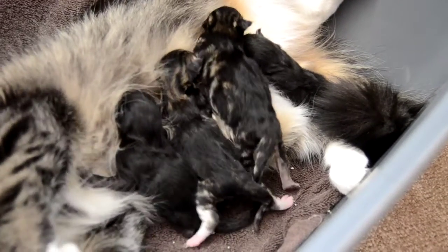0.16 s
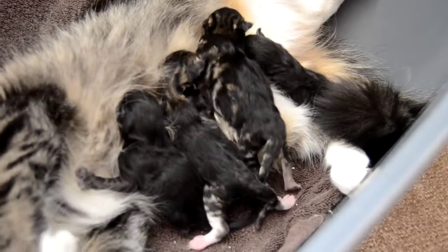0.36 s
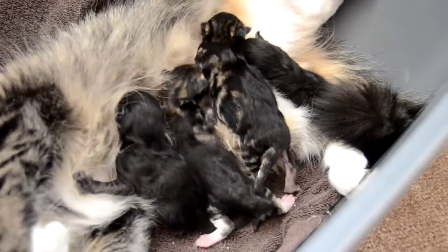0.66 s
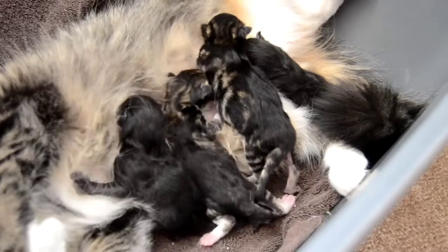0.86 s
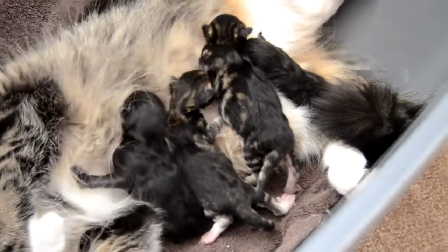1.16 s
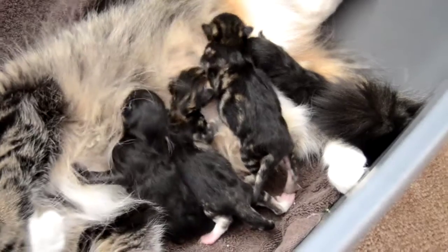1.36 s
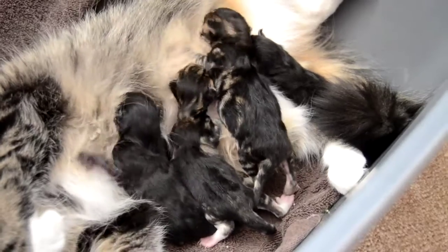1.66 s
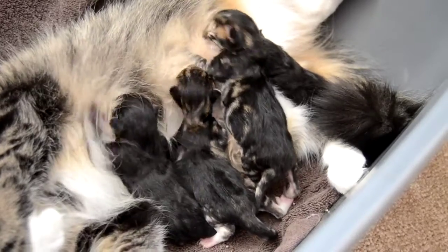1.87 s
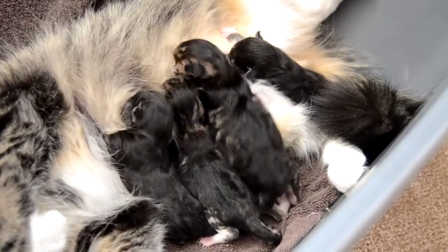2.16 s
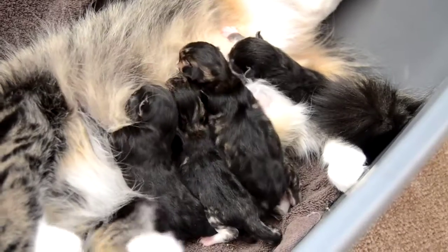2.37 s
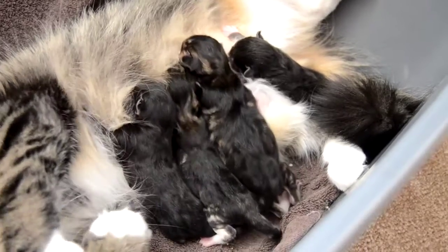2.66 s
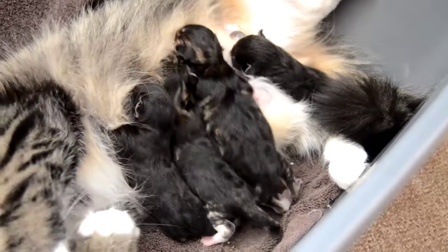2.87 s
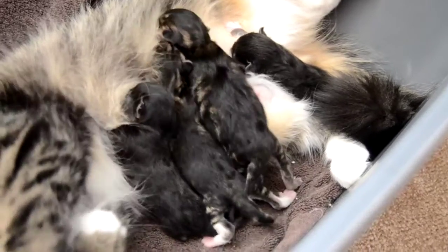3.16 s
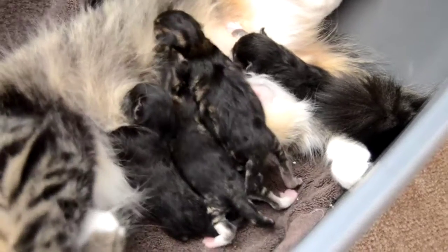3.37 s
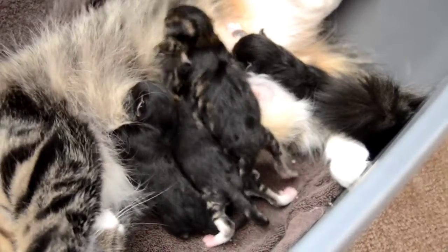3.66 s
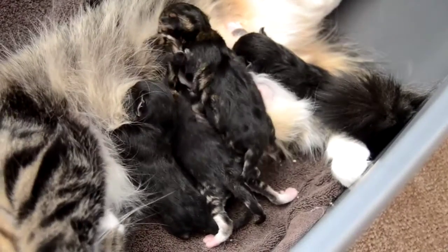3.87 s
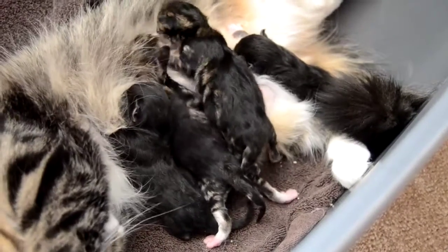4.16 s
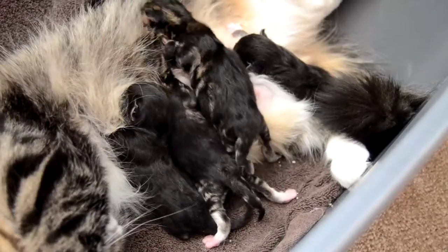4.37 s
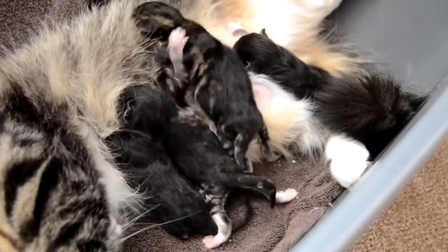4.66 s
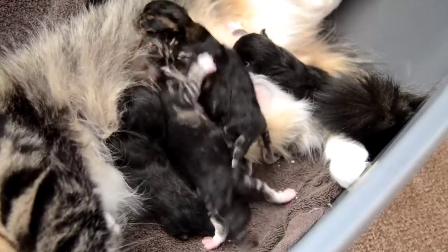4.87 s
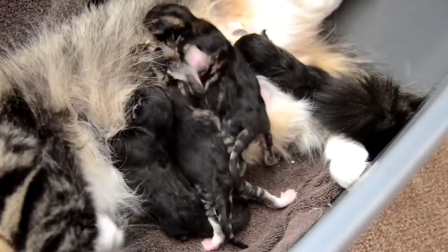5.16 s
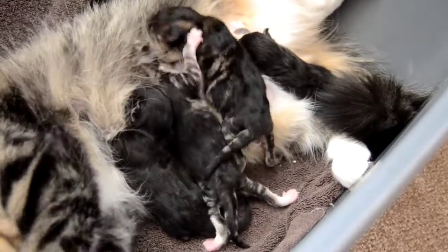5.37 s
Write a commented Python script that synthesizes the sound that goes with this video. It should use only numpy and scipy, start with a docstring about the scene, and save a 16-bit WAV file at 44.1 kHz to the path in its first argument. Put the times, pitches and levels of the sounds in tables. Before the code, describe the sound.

Soft low purring swells and fades in a quiet room while close, dry mechanical clacks and short whirrs repeatedly break in.

```python
"""A quiet room sounds throughout, with a mother cat's soft purr swelling in surges, as a pulse train through chest modes.
Near 0.6-1.5 s a camera's focus drive hunts in short moves: jolt, whirr and stop are noise through body modes,
carried by the plastic body to the built-in microphone, far louder than the purr. Nostril hiss and kittens'
shuffling, both filtered noise, come near 2.1 s; the drive's second bout follows near 2.7-3.8 s.
From 4.2 s come fainter nostril hiss and more shuffling, and near 4.9-5.5 s the drive's third bout."""
import sys
import numpy as np
from scipy import signal
from scipy.fft import rfft, irfft, next_fast_len
from scipy.io import wavfile

SR = 44100
rng = np.random.default_rng(int(sys.argv[2]) if len(sys.argv) > 2 else 0)


def inscribe(sig):
    """Save sig as 16-bit PCM at rate SR to the path in sys.argv[1].

    A 1-D sig is mono; a 2-D sig holds one channel per row.
    Samples are clipped to [-1, 1] before scaling.
    """
    pcm = np.round(np.clip(np.atleast_2d(sig).T, -1, 1) * 32767)
    wavfile.write(sys.argv[1], SR, pcm.astype(np.int16))


N = 243873
TIME = np.arange(N) / SR

# Spectrum of the room and preamp noise [f/Hz, relative level/dB per Hz]
ROOM_SPECTRUM = [(20, -36), (40, -25), (70, -5), (130, -12), (210, -6), (400, -13), (1200, -15.5),
                 (4000, -26), (6000, -30.5), (8600, -29.5), (12000, -39), (16000, -48)]
ROOM_DB, ROOM_WAVER_DB = -64.5, .3

# Kittens shuffling in the fur [t/s, level/dB, length/s, centre f/Hz]
RUSTLES = [(2.053, -66.5, 0.048, 2360), (2.123, -53, 0.019, 2500), (2.151, -58.5, 0.023, 2670),
           (2.183, -60, 0.0059, 2520), (4.249, -67, 0.026, 3900), (4.7, -59.5, 0.0072, 2220),
           (4.785, -62.5, 0.016, 6460), (5.386, -53, 0.013, 2550)]

# Larynx clock: quicker breathing in, slower breathing out [t/s, purr cycles elapsed]
LARYNX_CLOCK = [(0, .72), (.542, 16), (.758, 22), (1.547, 45), (2.26, 66), (2.526, 74), (2.813, 82),
                (3.198, 93), (4.095, 119), (4.343, 126), (4.538, 132), (4.772, 139), (5.206, 151),
                (5.53, 160.6)]
# Chest resonances [f/Hz, width/Hz, level/dB]
CHEST_MODES = [(130, 130, 0), (235, 170, 2.5)]
# Surges of the purr [start t/s, swell/s, end t/s, level/dB, second pulse share]
PURR_SURGES = [(.05, 0.26, 0.64, -59, 0.43), (1.4, 0.083, 1.83, -62, 0.1), (1.98, 0.14, 2.38, -70, -0.87),
               (2.52, .1, 2.92, -59.5, 0.1), (3.62, 0.12, 4.05, -63.5, 0.76), (4.2, .1, 4.65, -68, -0.4),
               (4.76, 0.1, 5.18, -57.5, 0.2)]
# Between surges the purr is faint and its second pulse turns over
FADE_S, REST_DB, REST_SHARE = 0.1, -70, -0.42
REOPEN_S, JITTER_S, PULSE_SPREAD_DB = .0098, .0003, 1.1
# Pressure builds, then lets go; the purr's lowest notes are faint
BUILD_S, SNAP_HZ, BASS_LOSS_HZ = .005, 600, 58
# Turbulence under the pulses, and rattle on each pulse, relative to the chest sound
THROAT_AIR_DB, THROAT_RATTLE_DB = -15, -20
# Air through the nostrils on the in-breath [start t/s, end t/s, level/dB]
NOSTRIL_BREATHS = [(2.15, 2.46, -79.5), (4.25, 4.62, -85.5)]
SNIFF_EDGE_S = .08

# Thin parts that ring on after some stops [t/s, f/Hz, level/dB, t60/s]
PART_RINGS = [(.66, 6300, -52, 0.066), (.832, 2350, -60, 0.28), (.99, 5400, -61, 0.1),
              (1.273, 3070, -41, .065), (2.92, 2330, -61, .25), (2.92, 5350, -64, .15),
              (3.112, 3480, -62, 0.28), (3.112, 6250, -58, 0.073), (3.276, 5300, -60, .12),
              (3.566, 3070, -50, .05), (5.17, 2370, -57, 0.27), (5.325, 3500, -58, .2),
              (5.485, 4860, -60, .15)]
# Rising squeaks as the drive takes up load [t/s, length/s, from f/Hz, to f/Hz, level/dB]
LOAD_SQUEAKS = [(1.407, 0.03, 1480, 2730, -37.5), (3.711, 0.028, 1506, 3190, -36)]
# Bright ticks of a small part in the drive [t/s, nominal peak level/dB]
PART_TICKS = [(0.5856, -25), (0.7433, -23), (1.1323, -18), (1.1513, -31), (1.1918, -34), (2.6678, -34),
              (2.6783, -21.5), (2.827, -29), (3.5658, -25.5), (3.6346, -29), (4.9182, -34), (4.9283, -22.5),
              (5.0809, -26)]
# Modes of that small part [f/Hz, width/Hz, relative level/dB]
SMALL_PART_MODES = [(9520, 770, 2), (8000, 800, -6.5)]
TICK_T60_S, TICK_MAKEUP_DB = 0.0038, 9.0

# Moves of the drive, levels at 1.5-5.5 kHz unless named otherwise [start t/s, jolt peak level/dB, jolt t60/s,
# its relative treble level/dB, whirr start level/dB, whirr end level/dB, mid-move swell/dB, extra bass/dB,
# extra treble/dB, bass thump level/dB, stop t/s, catch peak level/dB, knock delay/s, knock peak level/dB,
# its relative bass level/dB]
DRIVE_MOVES = [(0.57, -24.5, 0.064, -18, -38, -49.5, 0.4, 1.5, 0, -53, 0.6579, -24, 0.0023, -51, -24),
               (0.7355, -20.5, .034, -24, -32.5, -52.5, -0.2, -1, -1.5, -41.5, 0.8248, -24, 0.004, -18, -24),
               (0.905, -22, 0.038, -13, -40, -50.5, 1, 1, -0.3, -53.5, 0.9849, -25, 0.0035, -20.5, -24),
               (1.071, -28, 0.015, 3, -42.5, -40.5, 2, 3.5, 1.2, -55, 1.268, -45, 0.0035, -18.5, -12.5),
               (1.3253, -21.5, 0.013, -18, -35.5, -47.5, -1, 0.7, .6, -46.5, 1.498, -23, 0.0039, -20, -28),
               (2.6581, -16.5, 0.027, -16, -38.5, -51.5, 2, 1.5, 0, -51, 2.7465, -26, .002, -29.5, -16),
               (2.8204, -15.5, 0.024, -21, -37.5, -48, -2.5, -4, 0.3, -49, 2.9144, -24, 0.0031, -18.5, -18.5),
               (3.0292, -19, 0.043, -17, -42.5, -50.5, 0, 2.5, 1.5, -66, 3.1053, -23.5, 0.005, -20, -25),
               (3.2037, -29, 0.047, -2, -45.5, -41.5, 2.5, -.6, 0.2, -53.5, 3.272, -36, 0.0019, -14, -17.5),
               (3.3362, -25, .015, 2.5, -46, -41.5, 1.5, 1, 1.5, -61, 3.562, -40, 0.0024, -15.5, -17.5),
               (3.628, -24, 0.029, -13, -40, -52.5, 4, -1, 2, -63, 3.7872, -22, 0.0061, -25.5, -24),
               (4.9083, -17.5, 0.019, -14, -35.5, -48, -1.5, .6, 0.7, -52, 4.995, -26.5, 0.0015, -21.5, -26),
               (5.0736, -17.5, 0.029, -19, -40.5, -49.5, 0.7, .6, -0.5, -40.5, 5.1668, -24, 0.003, -22, -26),
               (5.241, -28, 0.045, -10, -38.5, -53, 3, -3, -0.3, -60, 5.3202, -21, 0.0038, -23.5, -21),
               (5.4084, -27.5, 0.028, -1, -42.5, -48, -1.5, 2, .6, -50.5, 5.4813, -26, 0.0018, -19, -42)]
GLIDE_POWER, TAKE_UP_S, THUMP_S, THUMP_WIDTH_S = 1.54, 0.02, 0.026, 0.0082
# Whirr under 700 Hz, at 700-1500 Hz and over 5.5 kHz
# [level/dB while the middle is at WHIRR_DB, share of its swing, level missing at the start/dB]
WHIRR_SIDE_BANDS = [(-58.5, 0.84, -11.5), (-51.5, 1, -4), (-53.5, 0.79, -4.5)]
WHIRR_DB = -45
# Further gear knocks, during moves or just after a stop
# [t/s, peak level/dB, relative level under 700 Hz/dB, t60/s]
GEAR_KNOCKS = [(0.5798, -24, -37, 0.025), (0.5846, -30, -36, 0.044), (0.746, -26, -24, 0.026),
               (0.754, -28, -14, 0.052), (0.9285, -25.5, -31, 0.026), (1.0312, -45, -16, .038),
               (1.0984, -14.5, -35, 0.029), (1.1082, -21.5, -10.5, 0.018), (1.1238, -16, -19, 0.022),
               (1.129, -14.5, -25, .017), (1.152, -26, -19, 0.051), (1.1747, -30, -29, 0.019),
               (1.193, -33.5, -3, 0.016), (1.2212, -26, -6, 0.02), (1.333, -30, -19, .033),
               (1.3503, -33, -1, 0.051), (2.6712, -20, -13, 0.032), (2.6786, -19, -25, 0.024),
               (2.829, -17, -32, 0.031), (2.8443, -34, 5, 0.025), (3.045, -31.5, -32, 0.097),
               (3.229, -28, -18, 0.044), (3.2877, -29, 1, 0.017), (3.3438, -26.5, -27, 0.025),
               (3.3826, -21, -31, 0.041), (3.3902, -30.5, -12.5, 0.077), (3.4271, -20.5, -10, 0.016),
               (3.6336, -30, -19, 0.033), (3.6452, -26, -8.5, .035), (4.9189, -16, -14.5, 0.027),
               (4.928, -28, -20, 0.05), (5.081, -20, -34, 0.044), (5.0982, -38, -20, .015),
               (5.4323, -25.5, -30, .043)]
# A bassy knock is fuller at 700-1500 Hz too
KNOCK_LOW_DB, LOW_PER_BASS, KNOCK_HIGH_DB = -7.5, 0.2, -16
KNOCK_CREST_DB, KNOCK_RISE_S = 6.5, 0.00029
# Relative levels/dB of a jolt: under 700 Hz, at 700-1500 Hz
JOLT = (-26, -20)
# Of a catch: the same two, over 5.5 kHz, then t60/s
CATCH = (-24.5, -19.5, -3.5, 0.0588)
# Of a stop knock: at 700-1500 Hz, over 5.5 kHz, then t60/s
STOP = (-17.5, -14, 0.037)
# Relative knock length in the bands 1.5-5.5 kHz, under 700 Hz, 700-1500 Hz, over 5.5 kHz
KNOCK_LENGTHS = (0.61, 1.3, 1.36, 0.5)
# Camera body resonances in those four bands [f/Hz, width/Hz, running level/dB, knocked level/dB]
MID_MODES = [(1555, 163, -10, -7.5), (2099, 317, 2.5, -1), (2267, 168, 3.5, 4.5), (2563, 155, -1, -0.5),
             (2936, 156, 0, 1), (3350, 207, -2, 1.5), (3620, 110, -3.5, -1), (3975, 204, -8.5, -5),
             (4716, 360, -3, -6.5), (5237, 370, -9, -10)]
BASS_MODES = [(245, 115, 0.18, 0), (650, 107, -0.18, 0.6)]
LOW_MODES = [(747, 100, -4.5, -2), (1029, 89, 1.5, 6), (1354, 340, -6, -3.5)]
HIGH_MODES = [(6240, 400, -0.5, 10), (6820, 81, -0.5, 13), (7440, 550, -6.5, 8.5), (8380, 490, -10, -5),
              (8500, 220, -8.5, -38), (10230, 2000, -11.5, -0.5), (12300, 1500, -22, -24),
              (13400, 2400, -27, -32)]
# Modes above this get a second, grainless noise
SECOND_NOISE_HZ = 11000
MODE_WANDER_DB, TOOTH_GRAIN_DB, TOOTH_CLUMP_DB = 2.0, 2.5, 2.0
TAIL_DB, TAIL_T60_S = -27, .07

# Microphone port [f/Hz, width/Hz, depth share]
PORT_CANCELLATIONS = [(5720, 330, .92), (6900, 160, .75)]
CUTOFF_HZ = 15800


def from_db(db):
    """Level definition: amplitude gain is ten to the power of dB over 20."""
    return 10 ** (np.asarray(db) / 20)


def rms_one(x):
    """Power normalization: scale to rms 1."""
    return x / np.sqrt(np.mean(x ** 2) + 1e-20)


def drift(rate):
    """Slow random modulation: normal random points, rate per second, joined by straight lines."""
    steps = TIME * rate
    last = int(steps[-1]) + 2
    return np.interp(steps, np.arange(last), rng.standard_normal(last))


def resonate(x, hz, width_hz):
    """Damped resonance: a two-pole mode with gain 1 on top."""
    r = np.exp(-np.pi * width_hz / SR)
    zeros = [(1 - r * r) / 2, 0, (r * r - 1) / 2]
    poles = [1, -2 * r * np.cos(2 * np.pi * hz / SR), r * r]
    return signal.lfilter(zeros, poles, x + 1e-18)


def ramp(start, length):
    """Linear growth: 0 before start, 1 after start + length."""
    return np.clip((TIME - start) / length, 0, 1)


def room():
    """Stationary noise: random pressure with a coloured spectrum and a level that wavers a little."""
    size = next_fast_len(N)
    hz = np.maximum(np.arange(size // 2 + 1) * SR / size, 1)
    table_hz, table_db = np.transpose(ROOM_SPECTRUM)
    shape = from_db(np.interp(np.log(hz), np.log(table_hz), table_db))
    noise = irfft(rfft(rng.standard_normal(size)) * shape, size)[:N]
    return from_db(ROOM_DB + ROOM_WAVER_DB * drift(4.13)) * rms_one(noise)


def rustle():
    """Friction noise: fur and claws brush cloth in brief grainy bursts, each around one broad resonance."""
    out = np.zeros(N)
    grains = rng.standard_normal(N) * from_db(2.5 * drift(300))
    for s, level_db, length, hz in RUSTLES:
        age = np.maximum(TIME - s, 0) / length
        brush = grains
        for _ in range(4):
            brush = resonate(brush, hz, hz)
        out += from_db(level_db) * rms_one(brush) * np.sqrt(age) * np.exp(-age ** 2)
    return out


def breath():
    """Amplitude modulation by breathing: surges swell, hold and fade; gives purr gain, pulse share, nostril gain."""
    level_db, second = np.full(N, float(REST_DB)), np.full(N, float(REST_SHARE))
    for start, swell, end, db, share in PURR_SURGES:
        shape = ramp(start, swell) - ramp(end, FADE_S)
        level_db = level_db + shape * (db - REST_DB)
        second = second + shape * (share - REST_SHARE)
    nose = np.zeros(N)
    for start, end, db in NOSTRIL_BREATHS:
        opening = ramp(start - SNIFF_EDGE_S / 2, SNIFF_EDGE_S)
        closing = ramp(end - SNIFF_EDGE_S / 2, SNIFF_EDGE_S)
        nose += from_db(db) * (opening - closing)
    return from_db(level_db), second, nose


def purr():
    """Source and filter: the vocal folds let go with a push, then a weaker one, exciting chest modes; air hisses."""
    gain, second, nose = breath()
    s, cycles = np.transpose(LARYNX_CLOCK)
    beats = np.interp(np.arange(1, int(cycles[-1])), cycles, s)
    chance = rng.standard_normal((len(beats), 4))
    pulses = np.zeros(N + SR)
    first = ((beats + JITTER_S * chance[:, 0]) * SR).astype(int)
    pulses[first] = from_db(PULSE_SPREAD_DB * chance[:, 1])
    later = first + ((REOPEN_S + JITTER_S * chance[:, 2]) * SR).astype(int)
    pulses[later] = -second[first] * from_db(PULSE_SPREAD_DB * chance[:, 3])

    # the slow build ends just before the beat, in a rounded drop
    build = np.linspace(0, 1, int(BUILD_S * SR)) ** 2
    pushes = signal.fftconvolve(pulses, build)[int(1.35 * len(build)):][:N]
    band = signal.butter(2, [BASS_LOSS_HZ, SNAP_HZ], "band", fs=SR, output="sos")
    pushes = signal.sosfilt(band, pushes)
    chest = sum(from_db(db) * resonate(pushes, hz, width) for hz, width, db in CHEST_MODES)

    air = resonate(resonate(rng.standard_normal(N), 330, 350), 330, 350)
    rattle = np.abs(chest) * resonate(rng.standard_normal(N), 860, 900)
    voiced = rms_one(chest)
    voiced = voiced + from_db(THROAT_AIR_DB) * rms_one(air)
    voiced = voiced + from_db(THROAT_RATTLE_DB) * rms_one(rattle)

    # nostril air passes once per purr cycle, while the folds are open
    phase = 2 * np.pi * (np.interp(TIME, s, cycles) - .7)
    gate = (.5 + .5 * np.cos(phase)) ** 1.5
    nostril_air = resonate(resonate(rng.standard_normal(N), 7500, 4000), 8200, 4000)
    return gain * voiced + nose * rms_one(gate * nostril_air)


def rings():
    """Free vibration: thin parts ring on as exponentially dying sines."""
    out = np.zeros(N)
    for s, hz, db, t60 in PART_RINGS:
        age = np.maximum(TIME - s, 0)
        out += from_db(db - 60 * age / t60) * np.sin(2 * np.pi * hz * age)
    return out


def squeaks():
    """Modulated carrier: a narrow band of noise on a rising sine makes a rough gliding tone."""
    out = np.zeros(N)
    for s, length, start_hz, end_hz, level_db in LOAD_SQUEAKS:
        age = np.clip((TIME - s) / length, 0, 1)
        phase = 2 * np.pi * np.cumsum(start_hz + (end_hz - start_hz) * age) / SR
        rough = drift(1300) * np.cos(phase) + drift(1300) * np.sin(phase)
        out += from_db(level_db) * np.sin(np.pi * age) * rough
    return out


def ticks():
    """Impact excitation: a few milliseconds of dying noise drive two high modes."""
    force = np.zeros(N)
    for s, peak_db in PART_TICKS:
        age = np.maximum(TIME - s, 0)
        force += from_db(peak_db - 60 * age / TICK_T60_S) * (TIME >= s)
    strike = rng.standard_normal(N) * force
    out = np.zeros(N)
    for hz, width, db in SMALL_PART_MODES:
        out += from_db(db + TICK_MAKEUP_DB) * resonate(resonate(strike, hz, width), hz, width)
    return out


def blows():
    """Impacts as (t/s, peak/dB, three relative dB, t60/s): jolt, catch and stop of each move, and gear knocks."""
    rows = []
    for s, peak_db, bass_db, t60 in GEAR_KNOCKS:
        low_db = KNOCK_LOW_DB + LOW_PER_BASS * bass_db
        rows.append((s, peak_db, bass_db, low_db, KNOCK_HIGH_DB, t60))
    for start, jolt_db, t60, treble_db, *_, stop, catch_db, delay, knock_db, bass_db in DRIVE_MOVES:
        rows.append((start, jolt_db, *JOLT, treble_db, t60))
        rows.append((stop, catch_db, *CATCH))
        rows.append((stop + delay, knock_db, bass_db, *STOP))
    return rows


def whirr_force():
    """Sustained excitation: force in four bands glides from its start level to its end level in each move."""
    running = np.zeros((4, N))
    band_db, share, missing_db = np.transpose(WHIRR_SIDE_BANDS)[:, :, None]
    for (start, _, _, _, first_db, last_db, swell_db, bass_db, treble_db, thump_db,
         stop, _, delay, *_) in DRIVE_MOVES:
        span = slice(round(start * SR), round((stop + delay) * SR))
        age = TIME[span] - TIME[span][0]
        progress = age / age[-1]
        main_db = last_db + (first_db - last_db) * (1 - progress) ** GLIDE_POWER
        main_db = main_db + swell_db * np.sin(np.pi * progress)
        running[0, span] = from_db(main_db)
        side_db = band_db + [[bass_db], [0], [treble_db]] + share * (main_db - WHIRR_DB)
        running[1:, span] = from_db(side_db + missing_db * np.exp(-age / TAKE_UP_S))
        running[1, span] += from_db(thump_db) * np.exp(-((age - THUMP_S) / THUMP_WIDTH_S) ** 2)
    # the teeth engage in uneven clumps
    return running * from_db(TOOTH_CLUMP_DB * drift(160))


def knock_force():
    """Impulsive excitation: each blow rises at once and dies exponentially, at its own rate in each band."""
    knocks = np.zeros((4, N))
    for s, peak_db, bass_db, low_db, high_db, t60 in blows():
        start = round(s * SR)
        lengths = t60 * np.array(KNOCK_LENGTHS)[:, None]
        age = TIME[:min(N - start, SR // 8)]
        decay = from_db(-60 * age / lengths) * np.minimum(age / KNOCK_RISE_S, 1)
        gains = from_db(peak_db - KNOCK_CREST_DB + np.array([0, bass_db, low_db, high_db]))
        knocks[:, start:start + len(age)] += gains[:, None] * decay
    return knocks


def focus_drive():
    """Modal synthesis: grainy gear-tooth noise, and smooth noise at the top, excite body modes of wandering strength."""
    teeth = rms_one(rng.standard_normal(N) * from_db(TOOTH_GRAIN_DB * drift(700)))
    smooth_noise = rng.standard_normal(N)
    out = np.zeros(N)
    groups = (MID_MODES, BASS_MODES, LOW_MODES, HIGH_MODES)
    for running, knocks, modes in zip(whirr_force(), knock_force(), groups):
        hz, width_hz, run_db, knock_db = np.transpose(modes)
        # scaled by the noise power the group passes, so that the band keeps the level of its force
        passed = np.pi * width_hz / SR
        run = from_db(run_db) / np.sqrt(np.sum(from_db(run_db) ** 2 * passed))
        knock = from_db(knock_db) / np.sqrt(np.sum(from_db(knock_db) ** 2 * passed))
        for k in range(len(modes)):
            force = (run[k] * running + knock[k] * knocks) * from_db(MODE_WANDER_DB * drift(25))
            source = smooth_noise if hz[k] > SECOND_NOISE_HZ else teeth
            # neighbouring modes alternate in sign
            out += (-1) ** k * resonate(source * force, hz[k], width_hz[k])
    return out


def tail(x):
    """Diffuse decay: the body and the pen around the cats ring out as exponentially dying noise."""
    age = TIME[:SR // 5]
    response = rng.standard_normal(len(age)) * from_db(-60 * age / TAIL_T60_S)
    return signal.fftconvolve(x, response / np.linalg.norm(response))[:N]


def scene():
    """Superposition: room, kittens, purr and the focus drive with its tail add on one channel."""
    drive = rings() + squeaks() + ticks() + focus_drive()
    mix = room() + rustle() + purr() + drive + from_db(TAIL_DB) * tail(drive)
    return mix[None]


def record(dry):
    """Cancellation and band limiting: the microphone port weakens two narrow bands; the top is cut."""
    for hz, width_hz, depth in PORT_CANCELLATIONS:
        dry = dry - depth * resonate(dry, hz, width_hz)
    low_pass = signal.ellip(10, .5, 70, CUTOFF_HZ, fs=SR, output="sos")
    return signal.sosfilt(low_pass, dry)


dry = scene()
out = record(dry)
inscribe(out)
```